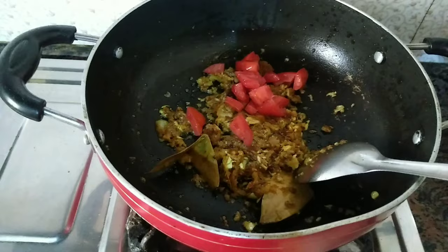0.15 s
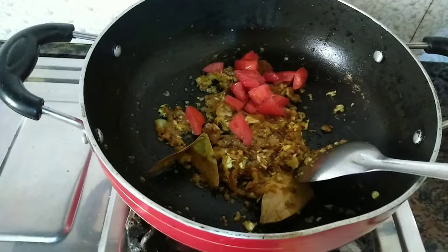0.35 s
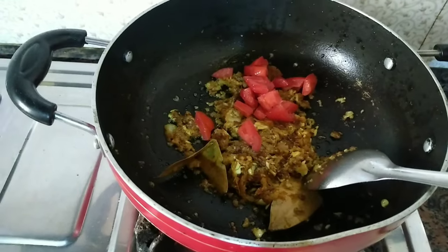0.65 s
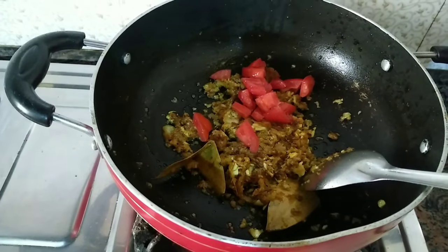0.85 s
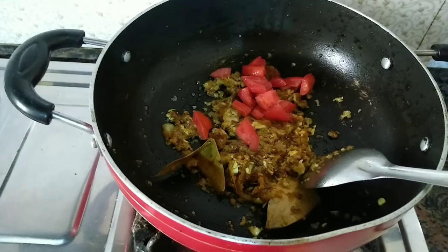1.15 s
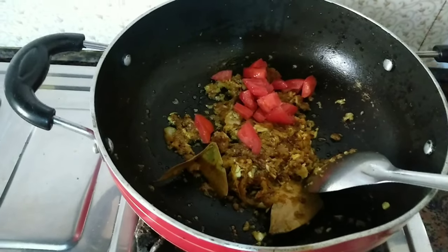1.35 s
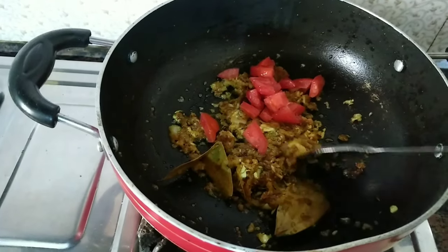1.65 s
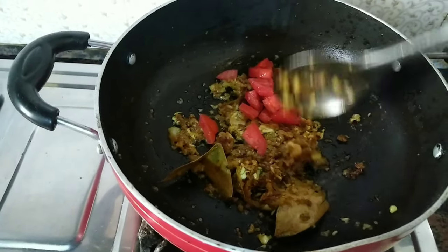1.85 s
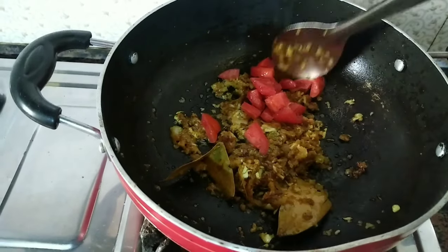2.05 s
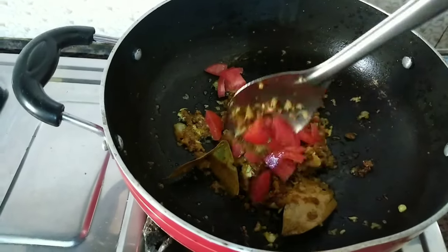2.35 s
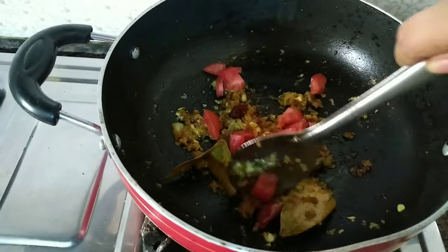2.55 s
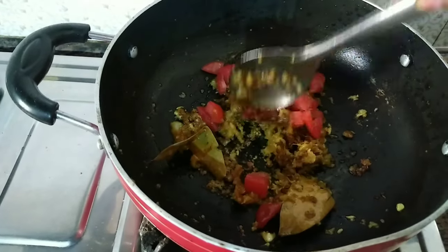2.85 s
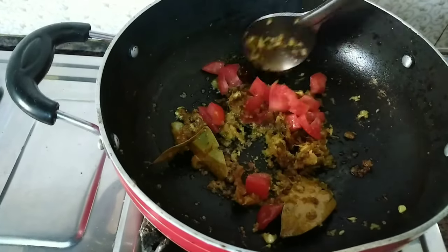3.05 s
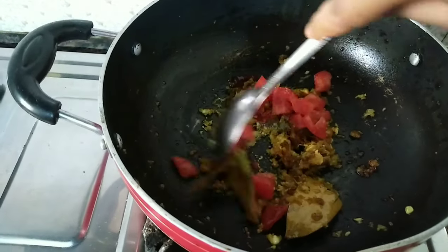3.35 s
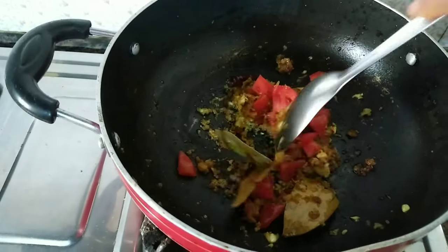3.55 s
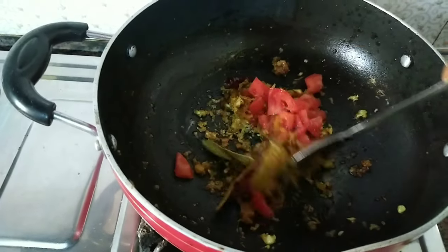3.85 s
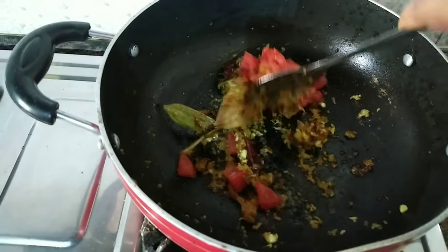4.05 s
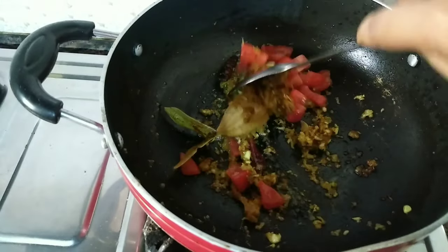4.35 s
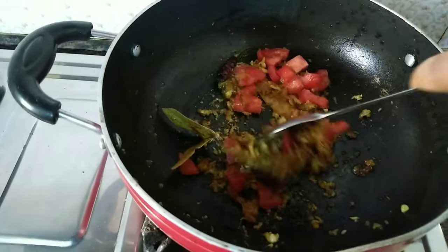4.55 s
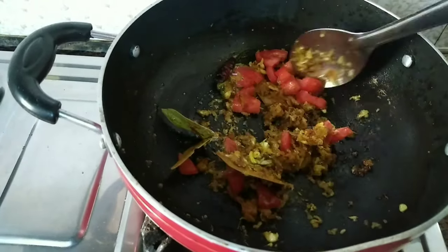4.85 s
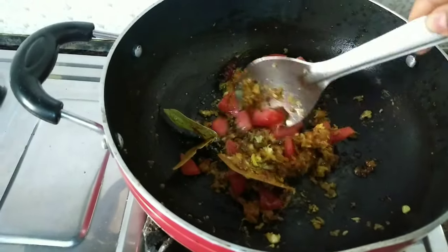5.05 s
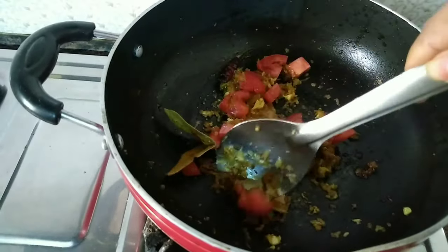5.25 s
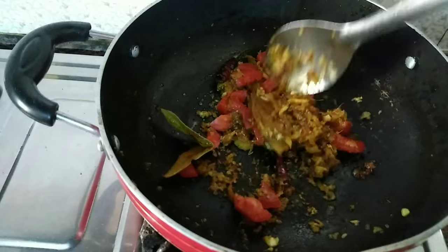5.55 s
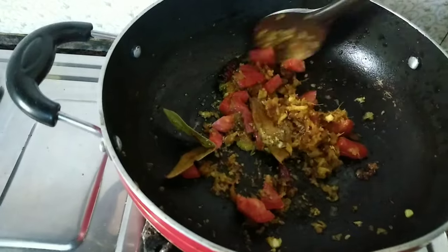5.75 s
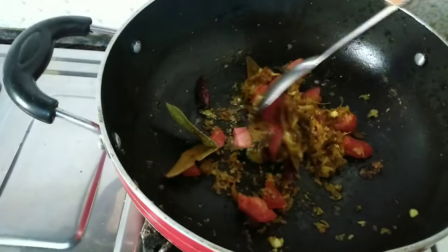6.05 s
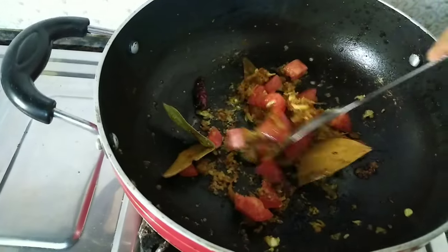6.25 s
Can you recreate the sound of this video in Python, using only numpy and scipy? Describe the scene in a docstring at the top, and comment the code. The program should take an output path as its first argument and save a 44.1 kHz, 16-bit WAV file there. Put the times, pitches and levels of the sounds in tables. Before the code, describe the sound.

Close, single-channel sound of tomatoes and onion paste frying. Crackling bubbles and popping drops come first, with two ringing steel clatters beside the stove. After nearly two seconds a spoon clacks, the sizzle drops, flares finely, then fades under faint taps. Loud double spoon knocks come past four seconds, followed by gentle renewed frying over a fluttering low burner. Short room echo.

```python
"""Tomatoes and onion paste sizzle in a pan in a small kitchen: random bubble bursts excite coloured noise.
Under them a gas burner roars and throbs, as filtered noise, steadily at first and later in puffs.
Early on a steel dish clatters down twice beside the stove: clicks excite decaying modes.
Then a metal spoon taps and stirs the pan, as coloured pulses and strokes of resonant noise.
Meanwhile the frying dies away as wet tomato covers the hot oil; it comes back when it is turned over."""
import sys
import numpy as np
from scipy import signal
from scipy.io import wavfile

SR = 44100
rng = np.random.default_rng(int(sys.argv[2]) if len(sys.argv) > 2 else 0)


def materialize(psi):
    """Save the field psi as 16-bit PCM at rate SR to the path in sys.argv[1].

    A 1-D psi becomes a single channel; in a 2-D psi each row is a channel.
    """
    bounded = np.clip(np.atleast_2d(psi).T, -1, 1)
    quanta = np.round(bounded * 32767).astype(np.int16)
    wavfile.write(sys.argv[1], SR, quanta)


N = 281799
TIME = np.arange(N) / SR

# heat under the food: (time [s], liveliness of the oil [dB], larger bubbles over the finest [dB])
OIL_HEAT = [(0.5, -46.5, 6), (1.52, -51, 6), (1.72, -65, 3.5), (1.84, -68, 5), (2.06, -46.5, -4.5),
            (2.2, -51, -1), (2.42, -60, -13), (2.8, -85, 9), (3.32, -78, 3.5), (3.38, -73.5, 1.5),
            (3.8, -76.5, 5), (4.1, -66, -3), (4.3, -52, 2.5), (4.8, -52.5, 5.5), (5.26, -53.5, -0.5),
            (5.42, -54.5, -6.5), (5.7, -58, -4.5), (6.39, -57.5, -9)]
# knocks of the spoon on the pan: (time [s], level [dB], brightness [dB per octave])
SPOON_KNOCKS = [(1.8644, -26, -5), (2.470, -47, -4), (2.552, -59, -5), (2.667, -51, -1),
                (2.998, -47.5, 15.5), (3.18, -57, 7), (3.351, -47.5, 3), (4.3178, -23, 0), (4.377, -29, 8),
                (4.399, -22, 0.5), (4.4016, -29, 16)]
# colour of a metal blow: (frequency [Hz], level [dB])
METAL_BLOW = [(200, -41.5), (1350, -11.5), (2000, 4), (3600, 1.5), (4600, -7.5), (6000, -14.5), (8000, -28),
              (15000, -49)]


def frying():
    """Steam bubbles: three sizes as lively as the heat allows, a fine mist, and paste at a slow boil."""
    # colours of the bubbles from fine to large, of the finest spray and of the boiling paste:
    # (frequency [Hz], level [dB per Hz])
    fizz_colour = [(3400, -19.5), (4300, 2), (5300, -1), (6400, -4.5), (7300, -2.5), (8900, -8.5),
                   (10300, -11.5), (12000, -33)]
    crackle_colour = [(2000, -9.5), (2600, 4), (3650, -0.5), (4100, -1), (5200, -18)]
    bubble_colour = [(850, -18), (980, -6), (1130, -11.5), (1550, -9.5), (1750, 2), (1980, 2), (2400, -4.5),
                     (3000, -24)]
    mist_colour = [(6000, -19.5), (10000, 4.5), (13000, -5), (14500, -1), (15500, -5)]
    simmer_colour = [(350, -13), (480, 3), (770, 3), (840, -6), (990, -0.5), (1130, -11.5), (1450, -11),
                     (2000, -21.5), (3000, -36.5)]
    large_db, large_follows = 1, 1  # level, and exponent with which large bubbles follow the coarseness
    wet_db = -75  # liveliness above which juice keeps touching hot metal
    simmer_db, simmer_follows = -41, 0.12  # level, and exponent with which the paste follows the oil

    heat = level(OIL_HEAT, column=1)
    coarse = level(OIL_HEAT, column=2)
    flurry = jolts()

    fizz = amp(-0.62) * bursts(fizz_colour, per_s=900, spread_db=3.5, wash_db=0.5)
    fizz *= np.hypot(heat, amp(-9.5) * flurry)

    # the mist starts as soon as any juice touches hot metal
    wetted = np.tanh(heat / amp(wet_db)) ** 2
    mist = amp(-44.5) * bursts(mist_colour, per_s=1500, spread_db=4.5, wash_db=0.5)
    mist *= wetted * heat ** 0.39

    crackle = amp(-3.0) * bursts(crackle_colour, per_s=1500, spread_db=3.0, wash_db=-3)
    crackle *= np.hypot(heat * coarse, amp(-9) * flurry)

    # independent causes add as powers
    large_power = (amp(large_db) * heat * coarse ** large_follows) ** 2
    large_power += flurry ** 2 + amp(-66.5) ** 2 * wetted
    bubbles = bursts(bubble_colour, per_s=1500, spread_db=4.5, wash_db=1.5) * np.sqrt(large_power)

    simmer = amp(simmer_db) * evened(coloured(rng.standard_normal(N), simmer_colour))
    simmer *= heat ** simmer_follows * wetted ** 0.24
    return simmer + kitchen(fizz + mist + crackle + bubbles, near_db=-14, near_s=0.0018, room_db=-16)


def jolts():
    """Exponential relaxation: each knock shakes juice into the oil, and a flurry of bubbles dies down."""
    jolt_db, decay_s = -21, 0.039  # level against the knock, and time constant
    kicks = np.zeros(N)
    for s, db, _ in SPOON_KNOCKS:
        add(kicks, s, amp(db + jolt_db) * np.exp(-TIME[:SR] / decay_s))
    return kicks


def spits():
    """Explosive boiling: a drop of water bursts in hot oil as a snap, the loudest with a short spray."""
    # the loudest spits: (time [s], level [dB], decay time of the spray [s])
    loud_spits = [(0.045, -21.5, 0.002), (0.533, -30, 0.0011), (0.825, -20, 0.0068),
                  (0.861, -20.5, 0.00089), (2.052, -27.5, 0.0025)]
    # colour of a spit: (frequency [Hz], level [dB])
    spit_colour = [(800, -20), (1800, 4.5), (4500, -4.5), (7200, -1), (9500, -9), (12000, -17),
                   (13600, -24), (14800, -12.5), (15400, -22.5)]
    small_per_s, small_db = 22, 15.5  # small random spits: mean rate, and level over the oil's liveliness
    t = TIME[:SR // 20]
    chance = rng.random(N) < small_per_s / SR
    out = chance * rng.uniform(-2, 2, N) * amp(small_db) * level(OIL_HEAT)
    for s, db, decay_s in loud_spits:
        spray = 0.29 * rng.standard_normal(len(t)) * np.exp(-t / decay_s)
        snap = 3.5 * (t == 0)
        add(out, s, amp(db) * (spray + snap))
    return kitchen(coloured(out, spit_colour), near_db=-4, near_s=.003, room_db=-9)


def dish():
    """Modal ringing: hard contacts excite the steel's modes, which a hand damps until it lets go."""
    # contacts as the dish lands and chatters: (time [s], blow level [dB], ring level [dB])
    contacts = [(.1083, 0, -2), (.1102, -3, -12), (.1111, -5.5, -14), (.1358, -4.5, -9), (.1487, -5, -14),
                (.1570, -13, -24), (.3086, -3, -18), (.3121, 0, 0), (.3156, -2.5, -18), (.3187, -5, -22),
                (.3209, -5, -24)]
    # modes of the free dish: (frequency [Hz], level [dB], decay time t60 [s])
    modes = [(958, -39, .6), (1475, -33, .17), (2246, -23, .2), (2510, -22, .2), (2816, -25, .16),
             (3120, -24, .13), (4003, -24, .34), (6310, -33, .24), (6325, -36, .24), (8140, -31, .15),
             (10560, -32, .14), (10300, -30, .05), (14280, -40, .09)]
    let_go_s = .31
    held_ring, held_pitch = 0.42, .98  # shares of ring time and pitch while the hand holds the dish
    slide_s, slide_db, slide_decay_s = 0.14, -24.5, .045  # it scrapes along after its first landing

    blows, rings, t = np.zeros(N), np.zeros(N), TIME[:SR // 2]
    blow = click(METAL_BLOW)
    for s, blow_db, ring_db in contacts:
        length, pitch = (held_ring, held_pitch) if s < let_go_s else (1, 1)
        add(blows, s, amp(blow_db) * blow / abs(blow).max())
        ring = np.zeros(len(t))
        for hz, db, t60 in modes:
            decay = np.exp(-np.log(1000) * t / (t60 * length))
            ring += amp(db) * decay * np.sin(2 * np.pi * hz * pitch * t)
        add(rings, s, amp(ring_db) * ring)

    scrape = bursts(METAL_BLOW, per_s=1200, spread_db=3.5, wash_db=-5)[:len(t)]
    scrape *= np.tanh(t / 0.013) * np.exp(-t / slide_decay_s)
    add(blows, slide_s, amp(slide_db) * scrape)
    return amp(-1) * kitchen(blows, near_db=-4.0, near_s=0.012, room_db=-5.5) + amp(-2.0) * rings


def spoon():
    """Impact and friction: knocks are broadband pulses, pushes and rubs are noise in one resonance."""
    # shoves of soft food and rubs on the pan:
    # (time [s], level [dB], length [s], resonance [Hz], width [Hz])
    strokes = [(1.441, -40.5, 0.15, 353, 163), (1.47, -45.5, 0.065, 4350, 1600),
               (2.044, -40, 0.077, 62, 20), (2.108, -56, 0.14, 2160, 190), (2.451, -37.5, 0.054, 362, 140),
               (2.532, -37.5, 0.05, 334, 100), (2.629, -39.5, .13, 60, 22), (4.269, -47.5, 0.51, 963, 140),
               (5.0, -54.5, 0.49, 3000, 1200)]
    knocks, shoves = np.zeros(N), np.zeros(N)
    for s, db, bright_db in SPOON_KNOCKS:
        knock = click(METAL_BLOW, bright_db)
        add(knocks, s, amp(db) * knock / abs(knock).max())
    for s, db, length, hz, width_hz in strokes:
        envelope = signal.windows.tukey(int(length * SR), .6)
        rub = evened(band(hz, width_hz).real[:len(envelope)])
        add(shoves, s, amp(db) * envelope * rub)
    return kitchen(knocks, near_db=-2, near_s=.004, room_db=-5) + shoves


def burner():
    """Turbulent combustion: the flame roars as broad noise and throbs in one low resonance under the pan."""
    # colours of the flame: (frequency [Hz], level [dB per Hz])
    roar_colour = [(200, -13.5), (265, -12), (295, 2.5), (400, -0.5), (460, -10.5), (750, -26),
                   (1100, -28.5)]
    rumble_colour = [(36, -19), (55, -10), (68, -14.5), (79, 6.5), (92, -8), (125, 2), (155, -0.5),
                     (190, -9.5), (235, -11.5), (300, -20.5)]
    # the unbroken throb at first: (time [s], level [dB])
    steady_throb = [(0.0, -33), (0.08, -33), (0.95, -43), (0.98, -37.5), (1.69, -34.5), (1.77, -56),
                    (1.82, -38), (3.01, -33.5), (3.12, -46.5)]
    # the separate puffs later: (middle [s], level [dB], length [s])
    flame_puffs = [(3.29, -32.5, 0.16), (3.532, -35.5, .06), (3.655, -32.5, .06), (3.926, -38.5, .085),
                   (4.235, -33.5, 0.29), (4.639, -35.5, 0.053), (4.96, -33.5, .06), (5.309, -31.5, 0.15),
                   (5.526, -32, 0.17), (5.71, -32.5, .13), (6.169, -36, .14), (6.37, -34, .09)]
    lull_db, flutter = -50.5, 1  # throb between puffs; softness of the limit on its random flutter
    surge_hz, surge_depth = 5.3, 0.35  # typical rate and depth of the random swell of the early throb

    roar = amp(-46.0) * evened(coloured(rng.standard_normal(N), roar_colour))

    surging = np.clip(1 + surge_depth * band(hz=surge_hz, width_hz=4.8).real, 0, None)
    fade_out = np.clip((steady_throb[-1][0] - TIME) / .03 + 1, 0, 1)
    steady = surging * level(steady_throb) * fade_out
    puff_power = np.zeros(N)
    for s, db, length in flame_puffs:
        puff_power += (amp(db) * np.exp(-(2 * (TIME - s) / length) ** 2)) ** 2
    swell = np.sqrt(steady ** 2 + puff_power + amp(lull_db) ** 2)

    rumble = coloured(rng.standard_normal(N), rumble_colour) * swell ** 0.31
    rumble = amp(-42.5) * evened(rumble)

    # narrow noise wanders in pitch and level; the division evens out its strongest surges
    wander = band(hz=103.4, width_hz=12.9)
    throb = evened((wander / (abs(wander) + flutter)).real)
    return roar + rumble + amp(-0.08) * throb * swell


def kitchen(x, near_db, near_s, room_db):
    """Reverberation: sparse early echoes off pan, stove and wall, then the diffuse tail of the room."""
    # reverberation of the room: (frequency [Hz], decay time t60 [s])
    room_decay = [(200, 0.71), (2000, 0.49), (5000, 0.36), (14000, 0.34)]
    t = TIME[:SR // 2]
    near = rng.standard_normal(len(t)) * (rng.random(len(t)) < .1)
    near *= np.exp(-t / near_s) * (t > .001)

    # each band of the tail decays at its own rate
    hz, at, z = signal.stft(rng.standard_normal(len(t)), SR, nperseg=256)
    decay = amp(-60 * at / read(room_decay, hz)[:, None])
    tail = signal.istft(z * decay, SR, nperseg=256)[1][:len(t)]
    tail *= np.clip(t / 0.0058 - .3, 0, 1)

    echoes = amp(near_db) * near / np.linalg.norm(near)
    echoes += amp(room_db) * tail / np.linalg.norm(tail)
    return x + signal.fftconvolve(x, echoes)[:N]


def bursts(colour, per_s, spread_db, wash_db, splash_s=0.009, splash_db=-2):
    """Shot noise: random bursts, each a snap and a brief splash, over a wash of countless tiny ones."""
    sizes = amp(spread_db * np.minimum(rng.exponential(1, N), 5)) * rng.choice([-1, 1], N)
    snaps = evened(sizes * (rng.random(N) < per_s / SR))
    # the splash follows the decaying power of the snaps
    splash = np.sqrt(signal.lfilter([1], [1, -np.exp(-1 / (splash_s * SR))], snaps ** 2))
    hiss = np.hypot(amp(splash_db) * evened(splash), amp(wash_db)) * rng.standard_normal(N)
    return evened(coloured(snaps + hiss, colour))


def band(hz, width_hz):
    """Resonance: complex noise in one steep band, of mean power 1."""
    offset = (np.fft.fftfreq(N, 1 / SR) - hz) / width_hz
    z = np.fft.ifft(np.fft.fft(rng.standard_normal(N)) / (1 + (2 * offset) ** 4))
    return z / np.std(z)


def click(points, tilt_db=0, size=8192):
    """Minimum phase: a causal pulse of energy 1 with the given colour, which falls away beyond its ends."""
    hz = np.maximum(abs(np.fft.fftfreq(size, 1 / SR)), 1)
    outside = abs(np.log2(hz / np.clip(hz, points[0][0], points[-1][0])))  # octaves
    db = read(points, hz) + tilt_db * np.log2(hz / points[0][0]) - 20 * outside
    log_gain = np.log(amp(np.maximum(db, -100)))
    # the Hilbert transform of the log gain gives the phase
    pulse = np.fft.ifft(np.exp(np.conj(signal.hilbert(log_gain)))).real[:size // 2]
    return pulse / np.linalg.norm(pulse)


def coloured(x, points):
    """Linear filtering: convolution with a pulse imposes its spectrum on a sound."""
    return signal.fftconvolve(x, click(points))[:len(x)]


def read(points, hz):
    """Logarithmic frequency: interpolates a curve along a log-frequency axis."""
    f, value = np.transpose(points)
    return np.interp(np.log(hz + 1), np.log(f + 1), value)


def level(rows, column=1):
    """Level envelope: one dB column of a curve over time as a gain for every sample."""
    rows = np.array(rows)
    return amp(np.interp(TIME, rows[:, 0], rows[:, column]))


def amp(db):
    """Decibel scale: level to amplitude gain."""
    return 10 ** (np.asarray(db) / 20)


def evened(x):
    """Mean power: scales a sound to rms 1."""
    return x / np.sqrt(np.mean(x ** 2) + 1e-20)


def add(mix, s, sound):
    """Superposition: adds a sound to the mix, in place, from time s."""
    part = mix[round(s * SR):][:len(sound)]
    part += sound[:len(part)]


def scene():
    """Superposition: the sounds of pan, burner, dish and spoon add in one channel."""
    return (frying() + burner() + dish() + spoon() + spits())[None]


def record(dry):
    """Limiting: peaks are clipped just under full scale, then a linear-phase low-pass limits the band."""
    edge_hz = 15600
    held = np.clip(dry, -.97, .97)
    lowpass = signal.firwin(511, edge_hz, window=("kaiser", 9), fs=SR)
    return signal.oaconvolve(held, lowpass[None], "same")


dry = scene()
out = record(dry)
materialize(out)
```